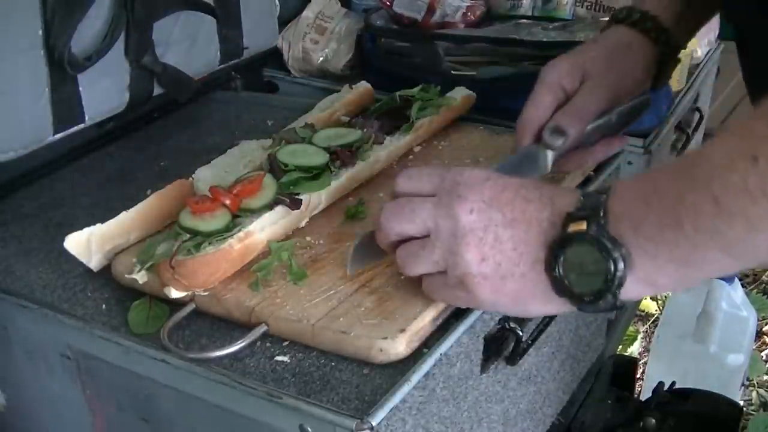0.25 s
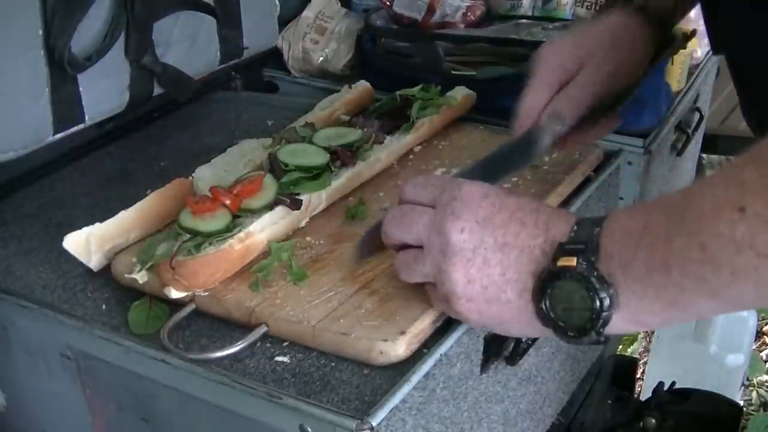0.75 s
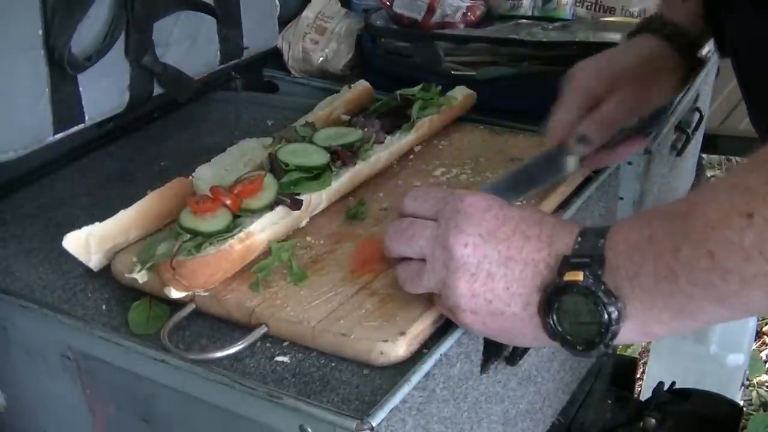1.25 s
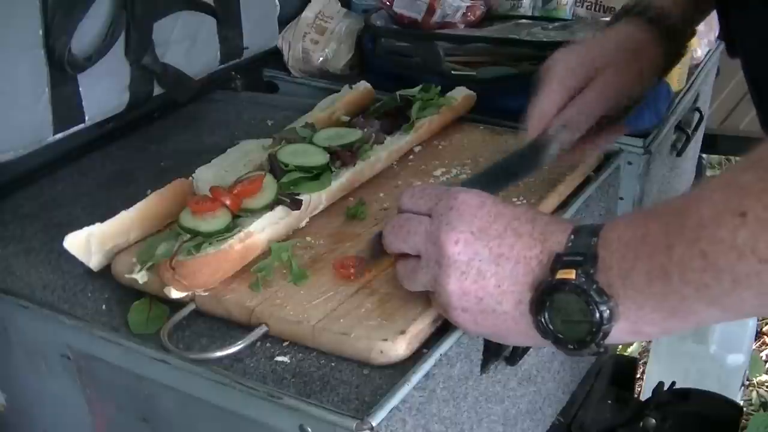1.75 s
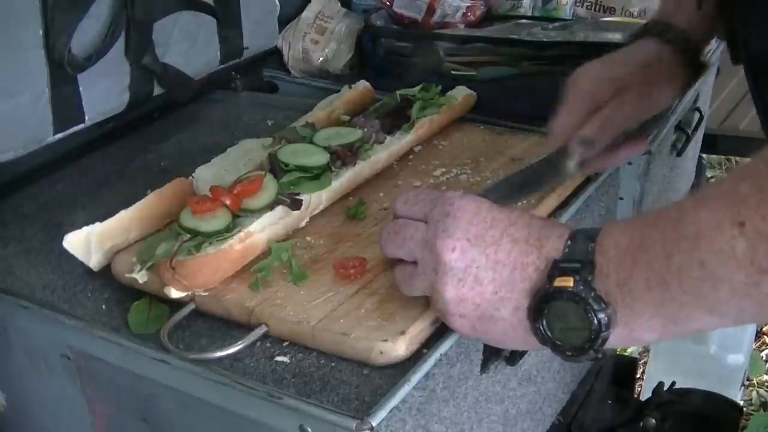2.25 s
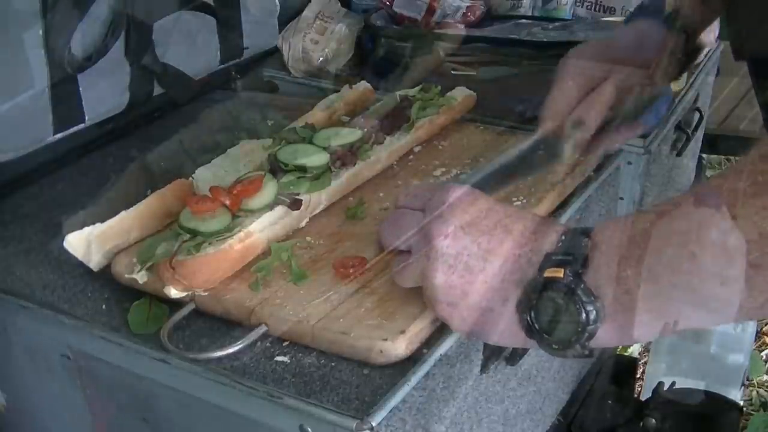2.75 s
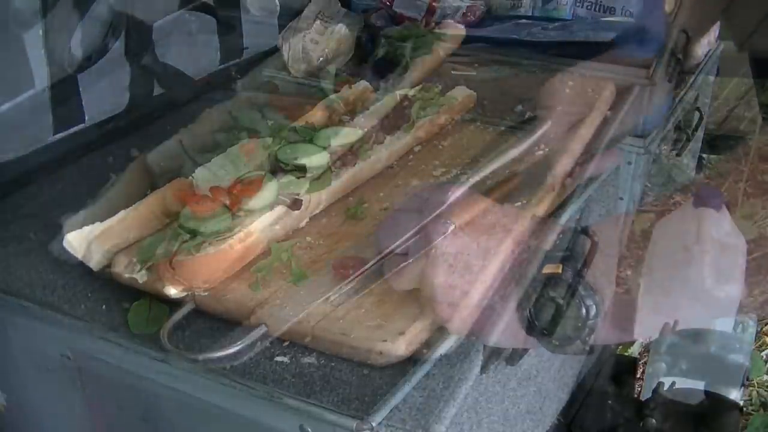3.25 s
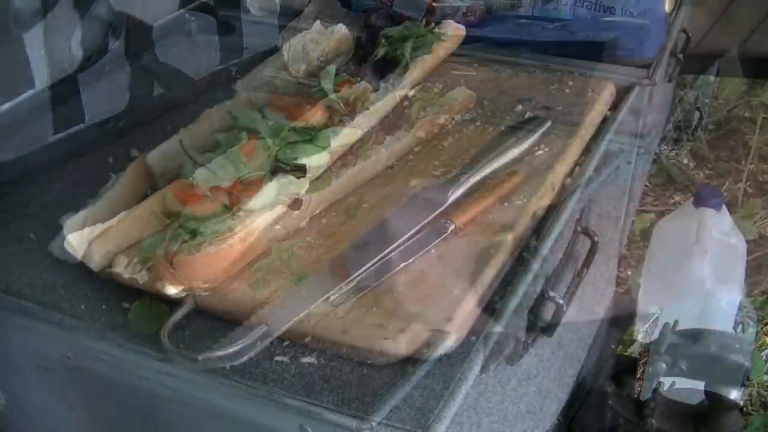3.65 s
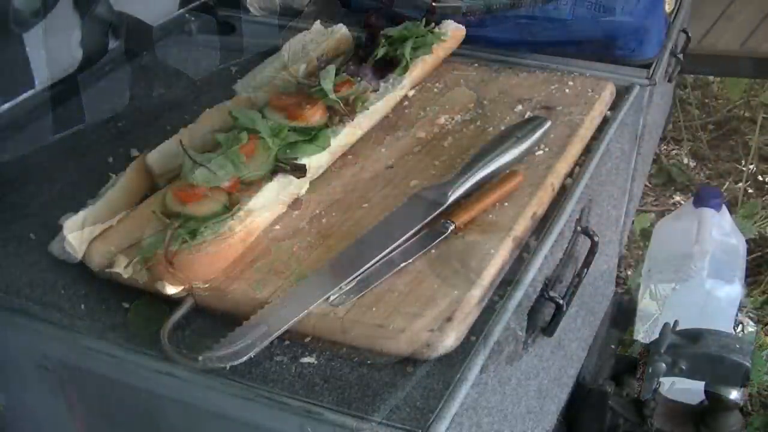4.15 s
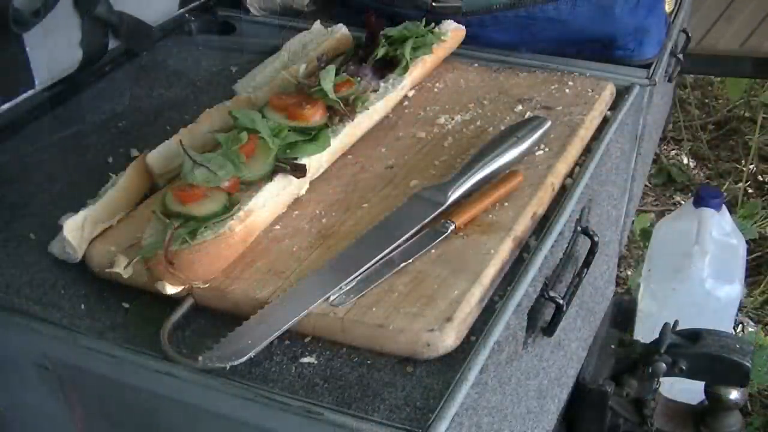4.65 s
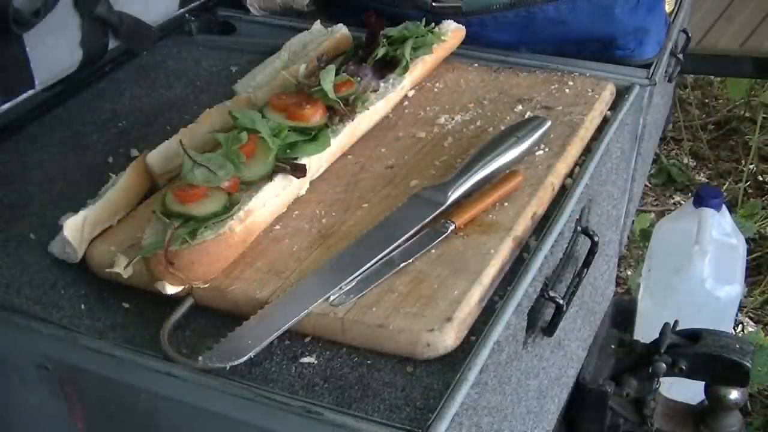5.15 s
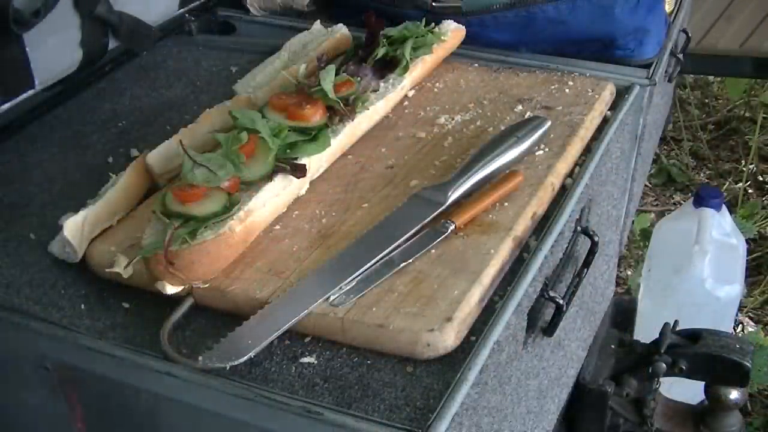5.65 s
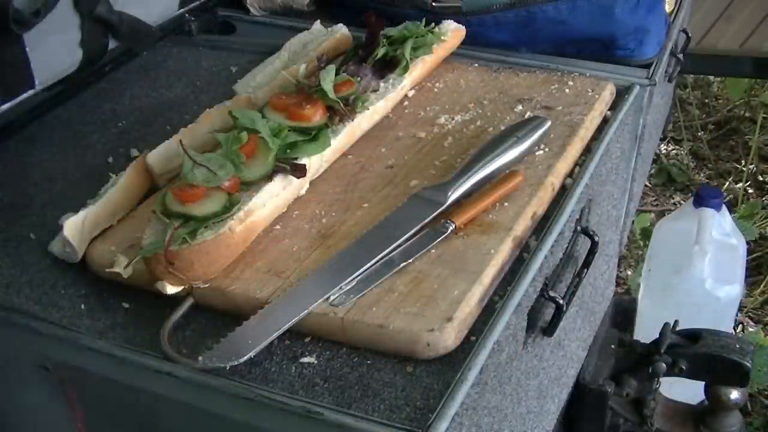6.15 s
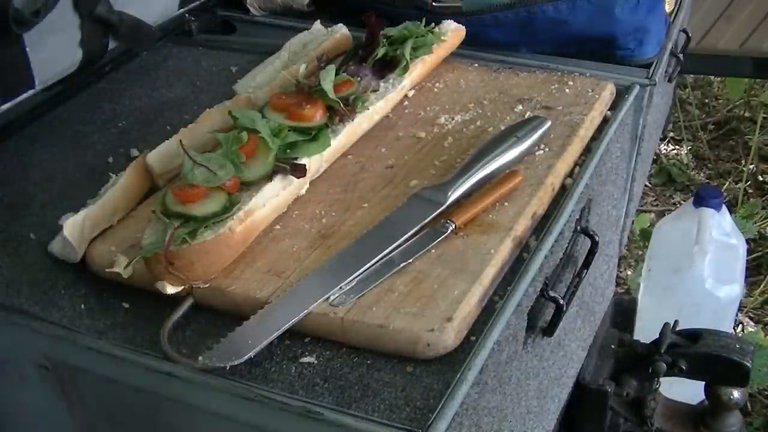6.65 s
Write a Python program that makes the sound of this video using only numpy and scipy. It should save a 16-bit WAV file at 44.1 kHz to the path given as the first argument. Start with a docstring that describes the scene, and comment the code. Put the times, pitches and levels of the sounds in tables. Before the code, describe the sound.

A serrated knife saws and ticks on a wooden board over faint outdoor air, then loud frying sizzle swells in and crackles on.

```python
"""Open air and a faint sizzle come first, then ticks and a knock: a knife at work on a board at an outdoor camp.
A serrated blade saws through food for a baguette; slips of its teeth ring the blade, blows ring the wooden board.
Sausages fry nearby: the sizzle swells on the left, then leans to the right. It is made of random impulses
for bursting fat bubbles plus their scatter, with single loud spits as short ringing snaps."""
import sys
import numpy as np
from scipy import signal
from scipy.fft import rfft, irfft, next_fast_len
from scipy.io import wavfile
from scipy.ndimage import uniform_filter1d, map_coordinates

SR = 44100
rng = np.random.default_rng(int(sys.argv[2]) if len(sys.argv) > 2 else 0)


def unload_audio(sound):
    """Save the sound as a 16-bit wav file, at the path given as the first command line argument."""
    columns = np.transpose(np.atleast_2d(sound))
    # keep every value between -1 and 1, then stretch to whole-number steps
    steps = np.round(np.clip(columns, -1, 1) * 32767)
    wavfile.write(sys.argv[1], SR, steps.astype(np.int16))


N = 304290

# open-air colour: (frequency [Hz], relative level [dB])
AIR_COLOUR = [(15, -60), (25, -35), (60, -14), (157, -4), (231, -6.5), (297, -3.5), (329, -4.5), (431, -3),
              (679, -15.5), (790, -17), (967, -19), (1400, -15), (1820, -49), (3080, -120)]
# swells of a faint hum: (start [s], length [s], peak level [dB])
HUM_SWELLS = [(2.4, 0.48, -62.5), (3.795, 0.99, -62.5)]
# the frying pan as it comes near: (time [s], sizzle level before the ports [dB], left over right [dB])
PAN_PATH = [(0, -55, 1), (.35, -53, 1.5), (1.5, -53.5, -0.5), (2.6, -50.5, 0), (3.65, -49.5, 0.5),
            (3.98, -43.5, 5), (4.1, -40.5, 8), (4.3, -36, 7.5), (4.48, -32.5, 2), (4.56, -29.5, 7),
            (4.68, -30.5, 7.5), (4.77, -30.5, 4.5), (5.18, -28.5, -3.5), (5.28, -31.5, -5.5),
            (5.55, -35, -9.5), (5.68, -36.5, -9), (5.87, -38.5, -8), (5.95, -35.5, -5.5), (6.45, -34.5, -7),
            (6.61, -38.5, -7), (6.72, -36.5, -6.5), (6.9, -39.5, -6)]
# sizzle colours from each side of the pan: (frequency [Hz], relative level [dB])
DISTANT = [(530, -13.5), (900, -13), (967, -16), (1050, -17), (1450, -14.5), (1690, -8.5), (2600, -6.5),
           (3070, -3), (3670, -6), (4080, -1.5), (11000, -18), (15500, -23.5)]
ENTERING = [(410, -31), (700, -19), (955, -24), (1240, -17), (1450, -17), (1670, -16.5), (3230, -4),
            (5360, -6), (8210, -17.5), (12600, -26), (15500, -31)]
BESIDE = [(290, -55), (500, -21), (686, -28), (781, -23.5), (1650, -17.5), (2100, -8.5), (2840, -5),
          (3380, -3), (4700, -9), (6550, -2.5), (8000, -17), (9650, -17), (11100, -24.5), (13600, -21),
          (15500, -29)]
PASSING = [(290, -51), (500, -33), (648, -26.5), (716, -23), (1030, -24.5), (1410, -18.5), (1490, -17.5),
           (2070, -5.5), (2760, -2.5), (4700, -6), (5670, -3.5), (7340, -11.5), (9790, -13.5),
           (11500, -27.5), (15500, -28)]
FINAL = [(350, -36), (600, -24.5), (890, -24.5), (1120, -26), (1470, -21), (1600, -15), (1830, -18),
         (2950, -9), (3710, -8), (4030, -4.5), (5900, -4), (8290, -17), (10000, -14), (11500, -24),
         (15500, -29)]
# crossfade points: distant until; entering, beside, passing (each from, to); final from: (time [s])
PAN_TURNS = [3.75, 4.12, 4.42, 4.56, 4.9, 5.15, 5.55, 6.0]
# short surges and one slight dip of the sizzle: (start [s], length [s], level change [dB])
SIZZLE_SURGES = [(4.223, 0.033, -2), (5.164, 0.026, 3), (5.816, .03, 2.5), (5.894, 0.031, 6.5),
                 (6.885, 0.016, 3)]
# the loudest spits of fat, before colouring: (time [s], peak level [dB], pitch [Hz])
LOUD_SPITS = [(3.5772, -25, 5000), (3.853, -26, 4600), (3.9956, -26, 4400), (4.085, -26, 3300),
              (4.231, -21, 3400), (4.246, -19, 3000), (4.3432, -17, 4100), (4.3956, -16, 3800),
              (4.4135, -14, 3300), (4.4425, -15.5, 3200), (4.4476, -17, 3600), (4.5832, -8.5, 3700),
              (4.666, -8, 5500), (4.678, -14.5, 6000), (4.851, -14.5, 6500), (4.9115, -14, 4400),
              (4.9738, -12.5, 3700), (5.0019, -10, 2800), (5.0493, -12, 3200), (5.1035, -9.5, 5400),
              (5.1711, -12, 4600), (5.3245, -16, 3200), (5.3594, -16.5, 2800), (5.4402, -14, 3900),
              (5.448, -18.5, 4500), (5.503, -17.5, 5000), (5.5393, -15, 2900), (5.55, -17, 3000),
              (5.6073, -15.5, 2800), (5.697, -15.5, 5300), (5.7476, -16, 5500), (5.7697, -16.5, 3500),
              (5.8154, -16, 5000), (5.9375, -17, 5500), (5.9718, -13, 5200), (6.1146, -18, 4100),
              (6.1278, -14.5, 4000), (6.2064, -11.5, 3500), (6.2718, -18.5, 4800), (6.3171, -13.5, 5800),
              (6.3562, -13.5, 5500), (6.4264, -18, 5800), (6.5472, -18.5, 4200), (6.5631, -17, 4600),
              (6.6742, -14.5, 6300), (6.7059, -11, 4800), (6.8093, -15.5, 4300)]
# shading by the camera body: (frequency [Hz], share of the left-right tilt [ratio])
BODY_SHADE = [(300, 0), (1300, 0), (2600, 0.92), (4000, 0.5), (4900, 0.4), (6000, 0.42), (9500, 0.3),
              (13000, -0.1)]
# light ticks of knife and crumbs, before the ports: (time [s], peak level [dB], pitch [Hz], tail t60 [s])
KNIFE_TICKS = [(0.133, -29.5, 6700, 0.019), (.135, -29.5, 2810, .03), (.136, -28, 6330, 0.34),
               (.254, -30.5, 6140, 0.43), (.279, -28.5, 4700, 0.28), (.389, -35, 2270, 0.02),
               (.51, -36.5, 3080, 0.066), (0.523, -39, 4500, .04), (0.885, -29.5, 3600, 0.036),
               (1.038, -34, 9300, .02), (1.069, -32, 2660, 0.037), (1.517, -28.5, 3740, 0.052),
               (1.727, -39, 5150, 0.018), (1.734, -34.5, 4430, 0.021), (1.916, -31, 4380, 0.066),
               (2.258, -29, 4500, .025), (2.39, -34, 6500, 0.048), (2.953, -31, 3070, 0.03),
               (3.157, -29.5, 4800, .012), (3.192, -34, 3340, 0.024), (3.36, -32, 6190, 0.011)]
# blows on the board, before filtering: (time [s], peak level [dB], hard-contact boost of upper modes [dB])
BLOWS = [(0.2777, -23, 2.5), (.294, -35, -1), (.885, -28, -5), (0.924, -47, -16), (1.8845, -23, 4),
         (1.899, -36.5, -14), (3.149, -23, 5), (3.232, -40, -5), (3.241, -33, -2), (4.311, -25, -1.5),
         (4.317, -20.5, 7), (4.345, -41, -15), (4.383, -42, -13)]
# contacts as the edge settles, delays scattered for each blow: (nominal delay [s], level [dB])
CHATTER = [(0, -1), (.0026, 1.5), (.0068, -11)]
# modes of the board: (frequency [Hz], relative level [dB], t60 [s])
BOARD_MODES = [(169, -8.5, 0.21), (227, -6.5, 0.19), (356, -3, 0.047), (458, 2.5, 0.03), (640, -4, 0.052),
               (826, 0.5, 0.019), (1296, 3, 0.018), (1500, -4, 0.032), (1670, 6, 0.023), (2056, 9.5, 0.017),
               (2700, 4.5, 0.011), (3790, 8.5, 0.0082), (5070, 6, 0.016)]
# sawing strokes, before colour and ports:
# (start [s], length [s], tooth hiss [dB], rasp of the edge on wood [dB], blade tuning [ratio])
STROKES = [(.765, .16, -45.5, -52, 1.0), (.975, 0.2, -43.5, -39.5, 1.007), (1.175, .07, -51, -44, 1.03),
           (1.213, 0.17, -43, -40.5, 0.98), (1.765, .15, -39.5, -49, 0.98), (1.98, 0.21, -37, -33.5, 0.99),
           (2.234, 0.14, -41, -40, 0.97), (2.803, .14, -45.5, -59, 1.0), (3.015, .09, -48.5, -47, 1.01),
           (3.124, .13, -44, -43.5, 0.97), (3.244, .26, -45, -40.5, 1.0)]
# resonances of the blade on the board: (nominal frequency [Hz], width [Hz], relative level [dB])
BLADE_MODES = [(396, 160, -10.5), (1478, 174, -1.5), (1682, 130, 1.5), (2120, 42, -3.5), (2674, 136, 1.5),
               (3390, 105, -1), (3770, 160, -3.5), (4418, 140, 7.5)]
# resonances of the teeth and thin edge: (nominal frequency [Hz], width [Hz], relative level [dB])
TEETH_MODES = [(4330, 176, 4.5), (4960, 160, 7), (5250, 2260, -5.5), (6570, 290, -0.5), (7530, 160, -6.5),
               (9500, 130, -4), (9980, 430, -8), (11400, 1800, -21), (13000, 320, -12)]
# likeness of the two ports for equal direct and diffuse sound: (frequency [Hz], likeness [0 to 1])
PORT_LIKENESS = [(300, .7), (1200, .88), (2800, .72), (4300, .82), (5200, .68), (6500, .78), (8200, .5),
                 (9800, .72), (12300, .25), (14500, .65)]
# phase by which the left port leads: (frequency [Hz], lead [rad])
PORT_LEAD = [(500, 0), (2600, -.7), (4500, -.3), (7500, -1.1), (10000, -.45), (11500, .5), (14000, 2.4)]
# level difference of the ports: (frequency [Hz], left over right [dB])
PORT_TILT = [(3000, 5), (5000, 0), (6500, 7), (8300, -2.5), (9700, -5), (11300, -0.5), (13000, 1.5)]

TOP_HZ = 15827
AIR_FAR_DB, AIR_NEAR_DB = -60.5, -58.5  # centre levels before the left-right tilt, at the board and by the pan
HUM_HZ = 305
# soft low bump (attack is a time constant), and the rumble that stays after it
BUMP_S, BUMP_DB, BUMP_ATTACK_S, BUMP_T60_S = 5.955, -49, .04, .25
RUMBLE_DB, RUMBLE_HZ = -72, 138
SURGE_EDGE_S = .005
PATCHES_FAR_DB, PATCHES_NEAR_DB = 1.2, 1.9  # rms depth of the flicker in the sizzle's colour
SPIT_WIDTH, SPIT_T60_S, SPIT_TAIL_DB = .3, .013, -3  # width as a ratio of the pitch
# lesser spits at random moments: peak over the sizzle before colouring, scattered evenly by up to the spread
SMALL_SPITS_PER_S, SMALL_SPIT_HZ = 22, 4620
SMALL_SPIT_DB, SMALL_SPIT_SPREAD_DB = 11, 2.5
# the blade sings as it leaves a cut
SQUEAK_S, SQUEAK_LENGTH_S, SQUEAK_HZ, SQUEAK_DB = 1.348, .052, 3125, -43
KNOCK_LOW_HZ = 150  # the knocks are thinned below this frequency
TEETH_PER_S, TOOTH_DROP_DB = 130, 8  # centre rate at full speed; how far the sound sinks between teeth
HISS_POWER, RASP_POWER = 1.0, 1.6  # gain grows as these powers of the blade's speed
MODE_DRIFT, MODE_SWING_DB = .012, 1.3  # scatter of blade resonances by stroke: pitch ratio, level


def amp(db):
    """Decibels to gain."""
    return 10 ** (np.asarray(db) / 20)


def unit(x):
    """Scale to rms 1."""
    return x / np.sqrt(np.mean(x ** 2) + 1e-20)


def along(points, hz):
    """Interpolate (frequency, value) points on a log frequency axis."""
    f, v = np.transpose(points)
    return np.interp(np.log(hz + 1), np.log(f + 1), v)


def curves(rows):
    """One value per sample for each column after the time."""
    s, *cols = np.transpose(rows)
    return [np.interp(np.arange(N) / SR, s, c) for c in cols]


def wobble(rate):
    """A smooth random curve, rate knots a second."""
    knots = rng.standard_normal(int(N * rate / SR) + 4)
    return map_coordinates(knots, [np.arange(N) * rate / SR])


def arch(start, length):
    """Half a sine: from rest up to 1 and back to rest."""
    return np.abs(np.sin(np.pi * np.clip((np.arange(N) / SR - start) / length, 0, 1)))


def filtered(x, response):
    """x times a complex response of frequency."""
    n = x.shape[-1]
    m = next_fast_len(n + SR // 10)
    return irfft(rfft(x, m) * response(np.fft.rfftfreq(m, 1 / SR)), m)[..., :n]


def resonate(x, modes):
    """x through parallel (frequency, width, level) resonances of alternating sign."""
    def response(f):
        return sum((-1) ** k * amp(db) * 1j * f * width / (hz * hz - f * f + 1j * f * width)
                   for k, (hz, width, db) in enumerate(modes))
    return filtered(x, response)


def add(track, s, sound):
    """Mix a sound in at time s."""
    part = track[..., round(s * SR):][..., :sound.shape[-1]]
    part += sound[..., :part.shape[-1]]


def grains(rate, spread_db):
    """Random tiny impulses of log-normal size, with clipped extremes, rms 1."""
    size = amp(spread_db * np.clip(rng.standard_normal(N), -3, 3))
    struck = rng.random(N) < rate / SR
    return unit(struck * size * rng.choice([-1, 1], N))


def scatter(x, t60):
    """Diffuse answer of nearby things: noise that follows the energy of x and dies away."""
    keep = amp(-120 / (t60 * SR))  # energy decay per sample
    energy = signal.lfilter([1 - keep], [1, -keep], x ** 2)
    return np.sqrt(np.abs(energy)) * rng.standard_normal(x.shape)


def pan(x, left_db):
    """Tilt a sound to the left; a negative tilt leans right."""
    return x * amp(np.array([[.5], [-.5]]) * left_db)


def ports(direct, diffuse):
    """Two microphone ports share the direct sound, with a phase lag, and differ in the diffuse part."""
    def turn(hz):
        return np.arccos(np.clip(along(PORT_LIKENESS, hz), 0, 1)) / 2

    def lag(hz):
        return np.exp(.5j * np.outer([1, -1], along(PORT_LEAD, hz)))

    mid = filtered(direct, lambda hz: np.cos(turn(hz)))
    side = filtered(diffuse, lambda hz: np.sin(turn(hz)))
    pair = np.array([mid + side, mid - side])
    return filtered(pair, lambda hz: pan(lag(hz), along(PORT_TILT, hz)))


def click(hz, width, t60, tail_db):
    """A snap ringing briefly at hz, then its scatter of energy tail_db: direct (peak 1) and diffuse part."""
    t = np.arange(SR // 10) / SR
    tail = amp(-60 * t / t60) * (1 - np.exp(-t / 0.001)) * rng.standard_normal((2, len(t)))
    push = amp(tail_db) * tail / np.linalg.norm(tail[0])
    push[0, 0] += 1
    ring = resonate(push, [(hz, width * hz, 0)])
    return ring / np.abs(ring[0]).max()


def outdoors():
    """Low open-air noise, a faint hum that swells twice, and one soft low bump that leaves a rumble."""
    t = np.arange(N) / SR
    noise = rng.standard_normal((2, N)) + 0.38 * rng.standard_normal(N)  # partly shared by both sides
    air_db = np.interp(t, PAN_TURNS[:2], [AIR_FAR_DB, AIR_NEAR_DB])
    coloured = unit(filtered(noise, lambda hz: amp(along(AIR_COLOUR, hz))))
    air = coloured * amp(air_db + wobble(4.68))
    air = filtered(air, lambda hz: pan(0.92, along([(60, 1), (200, 2.0), (600, 3.6)], hz)))
    swells = sum(amp(db) * arch(start, length) for start, length, db in HUM_SWELLS)
    hum = swells * np.sin(2 * np.pi * HUM_HZ * t + 0.92 * wobble(4.46))
    rise = np.exp(np.minimum(t - BUMP_S, 0) / BUMP_ATTACK_S)
    fall = amp(BUMP_DB - 60 * np.maximum(t - BUMP_S, 0) / BUMP_T60_S)
    bump = fall * unit(resonate(noise, [(99, 21, -3.0), (141, 33, -10.0), (190, 15, 4.0)]))
    rumble = amp(RUMBLE_DB) * unit(resonate(noise, [(RUMBLE_HZ, 30, 0)]))
    return air + hum + rise * (bump + rumble)


def bubbles():
    """Bursts of many sizes: each class of bubble snaps in its own broad band, at its own moments."""
    centres_hz = [1660, 3130, 4760, 6540, 11800]

    def burst_class(share):
        points = np.transpose([centres_hz, share])
        snaps = grains(rate=1100, spread_db=2.5)
        return filtered(snaps, lambda hz: np.sqrt(np.abs(along(points, hz))))

    return unit(sum(burst_class(share) for share in np.eye(len(centres_hz))))


def sizzle():
    """Steam bubbles burst in the fat, in flurries; their colour changes with the side of the pan."""
    flurries = amp(.9 * wobble(45))
    bursts = unit(bubbles() + .45 * grains(rate=900, spread_db=5.5)) * flurries
    direct = unit(bursts + .5 * scatter(bursts, t60=.008) + .28 * rng.standard_normal(N))
    drive = np.array([direct, 1.26 * unit(scatter(direct, t60=0.099))])
    far = .5 * drive + rng.standard_normal((2, N))  # distance blurs the single bursts

    def heard(source, colour):
        return unit(filtered(source, lambda hz: amp(along(colour, hz))))

    entering, beside, passing, final = (heard(drive, c) for c in (ENTERING, BESIDE, PASSING, FINAL))
    sides = [heard(far, DISTANT), entering, entering, beside, beside, passing, passing, final]
    t = np.arange(N) / SR
    return sum(side * np.interp(t, PAN_TURNS, share) for side, share in zip(sides, np.eye(len(PAN_TURNS))))


def surges():
    """Short surges and one slight dip in the sizzle level, in dB."""
    t = np.arange(N) / SR
    return sum(db * np.clip(np.minimum(t - s, s + length - t) / SURGE_EDGE_S + .5, 0, 1)
               for s, length, db in SIZZLE_SURGES)


def spits(sizzle_db):
    """Drops of water explode in the fat and the pan scatters the snap; small ones follow the sizzle level."""
    out = np.zeros((2, N))
    small = []
    for place, size, pitch in rng.random((int(SMALL_SPITS_PER_S * N / SR), 3)):
        peak_db = sizzle_db[int(place * N)] + SMALL_SPIT_DB + SMALL_SPIT_SPREAD_DB * (2 * size - 1)
        small.append((place * N / SR, peak_db, SMALL_SPIT_HZ * 2 ** (pitch - .5)))
    for s, db, hz in LOUD_SPITS + small:
        add(out, s, amp(db) * click(hz, SPIT_WIDTH, SPIT_T60_S, SPIT_TAIL_DB))
    # (frequency [Hz], gain [ratio])
    colour = [(400, .15), (2000, 1.0), (3000, 1.15), (6500, 1), (8300, .7), (10000, .85), (15000, .35)]
    return filtered(out, lambda hz: along(colour, hz))


def frying():
    """The pan swells on the left, then leans right; the camera body shades some bands of the far port."""
    level_db, left_db = curves(PAN_PATH)
    pair = ports(*(sizzle() * amp(level_db + surges()) + spits(level_db)))
    hz, s, z = signal.stft(pair, SR, nperseg=256)
    shade_db = np.outer(along(BODY_SHADE, hz), np.interp(s, np.arange(N) / SR, left_db))
    # the sizzle's colour flickers at random in narrow, short patches
    patches = uniform_filter1d(rng.standard_normal(z.shape[1:]), size=2, axis=0)
    patches = uniform_filter1d(patches, size=22, axis=1)
    patches_db = np.interp(s, PAN_TURNS[:2], [PATCHES_FAR_DB, PATCHES_NEAR_DB]) * unit(patches)
    gain = amp([patches_db + shade_db / 2, patches_db - shade_db / 2])
    return signal.istft(z * gain, SR, nperseg=256)[1][:, :N]


def ticks():
    """Small contacts snap and scatter; the blade sings for a moment, a wavering sine, as it leaves a cut."""
    out = np.zeros((2, N))
    for s, db, hz, t60 in KNIFE_TICKS:
        add(out, s, amp(db) * click(hz, width=0.26, t60=t60, tail_db=4.5))
    phase = 2 * np.pi * SQUEAK_HZ * np.arange(N) / SR + .5 * wobble(200)
    out[0] += amp(SQUEAK_DB) * arch(SQUEAK_S, SQUEAK_LENGTH_S) * np.sin(phase)
    return pan(ports(*out), left_db=-1.5)


def knocks():
    """The blade chatters down on the board, which shudders on the table; hard contact wakes the upper modes."""
    out, t = np.zeros((2, N)), np.arange(SR // 4) / SR
    for s, db, hard_db in BLOWS:
        contact = amp(-25.0 - 60 * t / 0.018) + amp(-33.0 - 60 * t / 0.26)  # short burst, long shudder
        push = contact * rng.standard_normal((2, len(t)))
        for (after_s, touch_db), luck in zip(CHATTER, rng.uniform(.7, 1.3, len(CHATTER))):
            add(push[0], after_s * luck, amp([touch_db]))
        signs = rng.choice([-1, 1], len(BOARD_MODES))
        wood = sum(amp(level + hard_db * (hz > 1000) - 60 * t / t60) * sign * np.sin(2 * np.pi * hz * t)
                   for (hz, level, t60), sign in zip(BOARD_MODES, signs))
        ring = signal.fftconvolve(push, wood[None], axes=1)[:, :len(t)]
        add(out, s, ring / np.abs(ring[0]).max() * amp(db))
    high_pass = signal.butter(2, KNOCK_LOW_HZ, "high", fs=SR, output="sos")
    return pan(ports(*signal.sosfilt(high_pass, out)), left_db=0)


def slips():
    """Each tooth catches and lets go in a spray of tiny slips; the faster the blade, the more teeth pass."""
    speed = sum(arch(start, length) for start, length, *_ in STROKES)
    passed = np.cumsum(TEETH_PER_S * np.sqrt(speed) * amp(2 * wobble(90))) / SR
    pressure = amp(1.2 * wobble(45))
    return unit(grains(rate=5400, spread_db=1.0) * amp(-TOOTH_DROP_DB * (passed % 1)) * pressure)


def sawing():
    """Slips ring the teeth, and the blade's lower modes on the wood; each stroke grips a little differently."""
    out, count = np.zeros((2, N)), SR // 3
    t = np.arange(count) / SR
    grit = slips()
    drive = np.array([grit, scatter(grit, t60=0.0039)])
    # (frequency [Hz], gain [ratio])
    edge_colour = [(1200, 0.046), (2500, 0.39), (4000, 0.23)]
    body_colour = [(450, 0.54), (1050, 0.64), (1450, 0.91), (3800, 0.69), (7000, 0.37)]
    for start, length, hiss_db, rasp_db, tuning in STROKES:
        speed = np.abs(np.sin(np.pi * np.minimum(t / length, 1)))
        push = drive[:, round(start * SR):][:, :count]
        hiss = (TEETH_MODES, edge_colour, amp(hiss_db) * speed ** HISS_POWER)
        rasp = (BLADE_MODES, body_colour, amp(rasp_db) * speed ** RASP_POWER)
        for modes, colour, gain in (hiss, rasp):
            luck = rng.standard_normal((len(modes), 2))
            gripped = [(hz * tuning * (1 + MODE_DRIFT * a), width, db + MODE_SWING_DB * b)
                       for (hz, width, db), (a, b) in zip(modes, luck)]
            ring = filtered(resonate(push, gripped), lambda hz: along(colour, hz))
            add(out, start, gain * unit(ring))
    return pan(ports(out[0], .5 * out[1]), left_db=-2.0)


def scene():
    """Open air, pan, knife and board."""
    return outdoors() + frying() + ticks() + knocks() + sawing()


def record(dry):
    """The camera keeps nothing above its band limit."""
    return filtered(dry, lambda hz: hz < TOP_HZ)


dry = scene()
out = record(dry)
unload_audio(out)
```